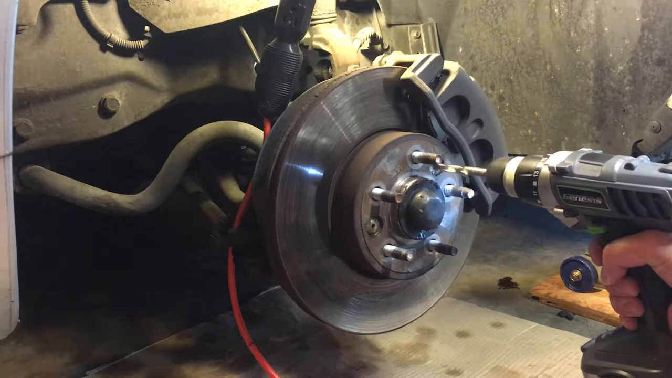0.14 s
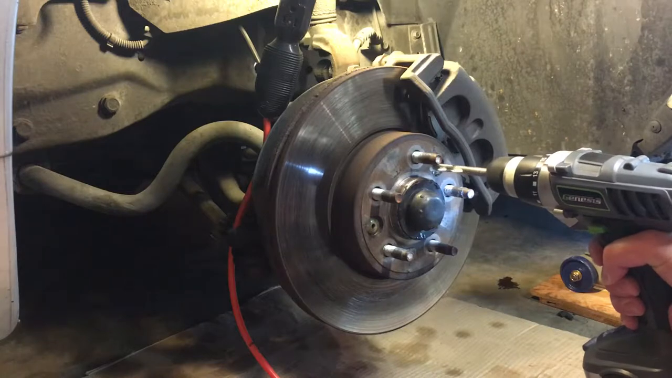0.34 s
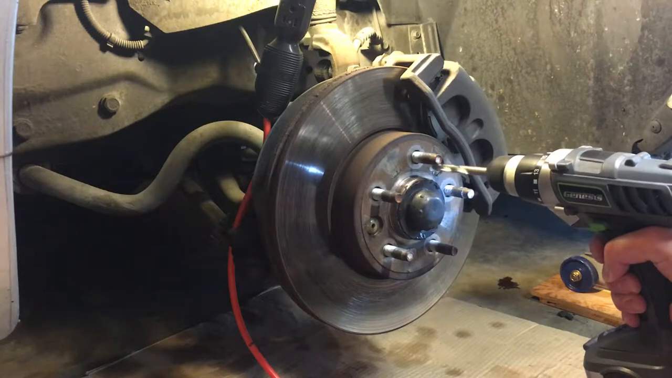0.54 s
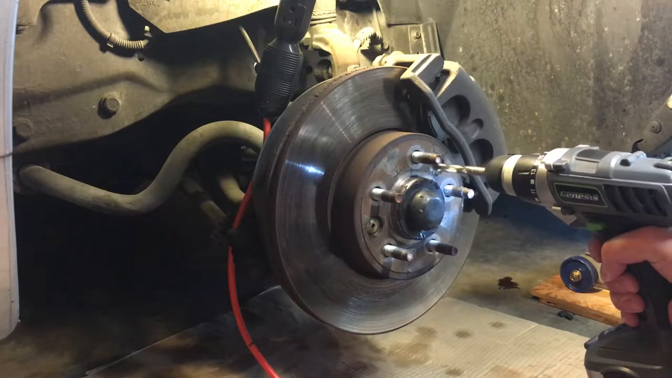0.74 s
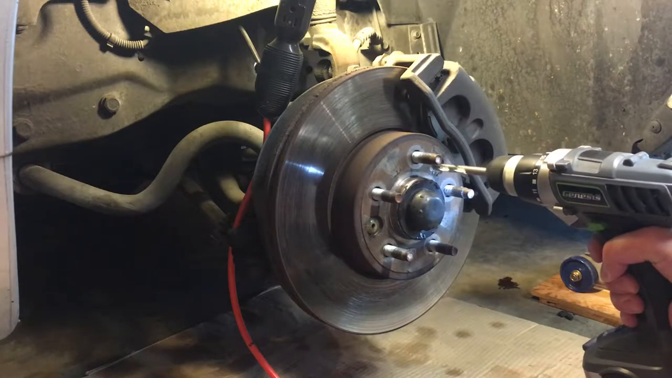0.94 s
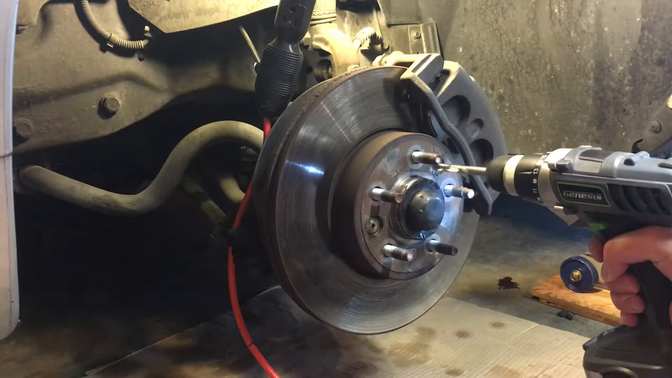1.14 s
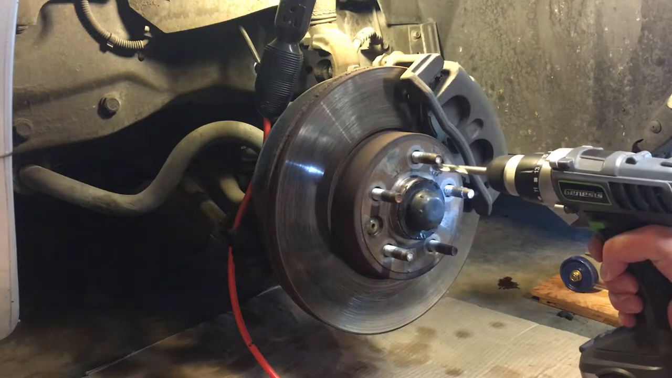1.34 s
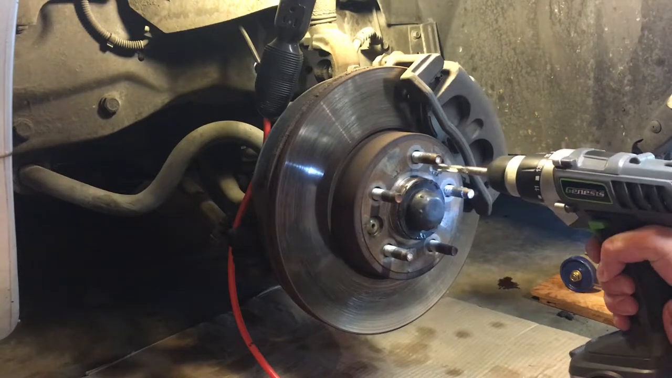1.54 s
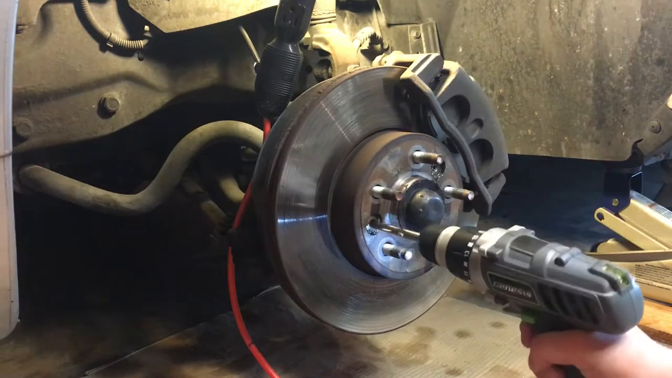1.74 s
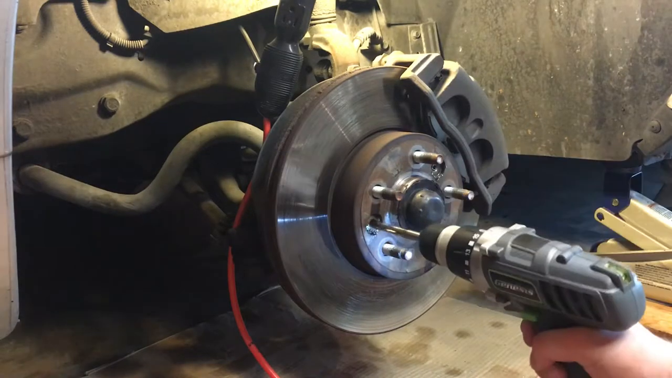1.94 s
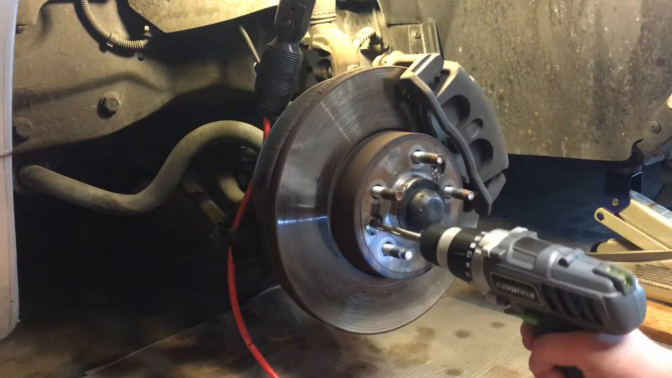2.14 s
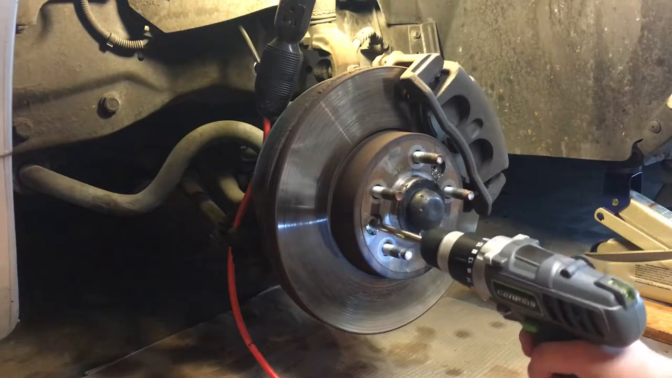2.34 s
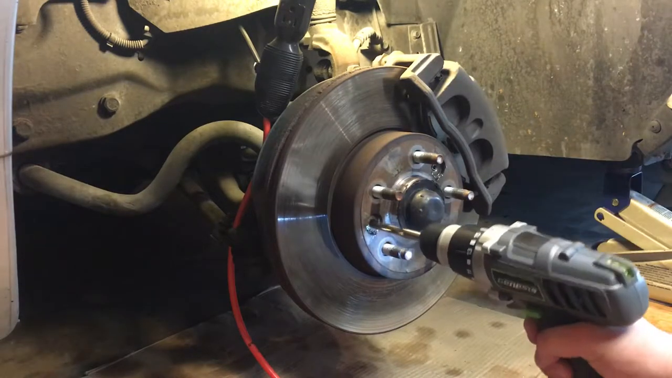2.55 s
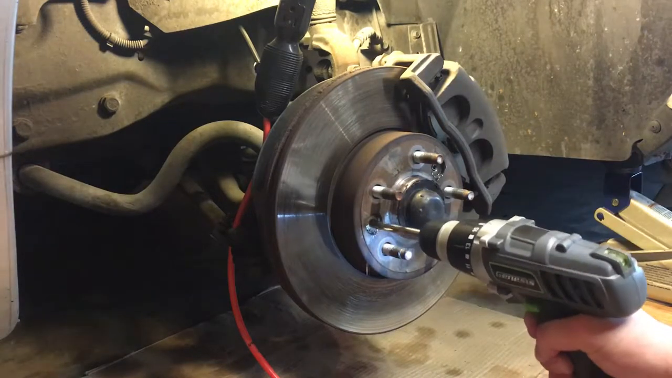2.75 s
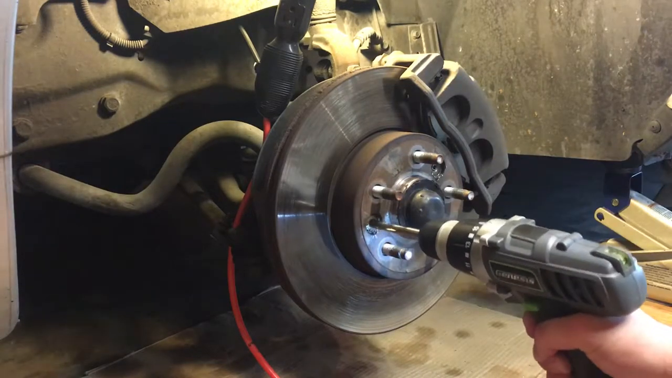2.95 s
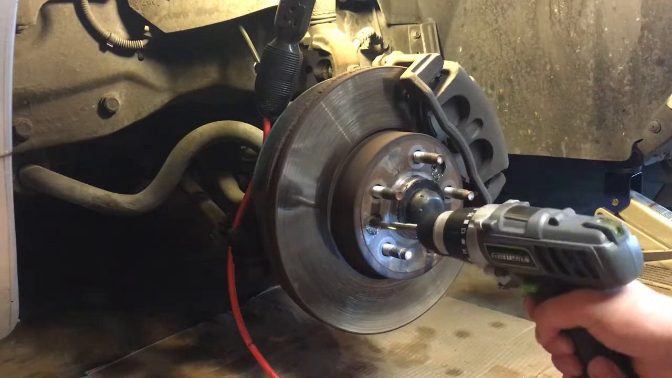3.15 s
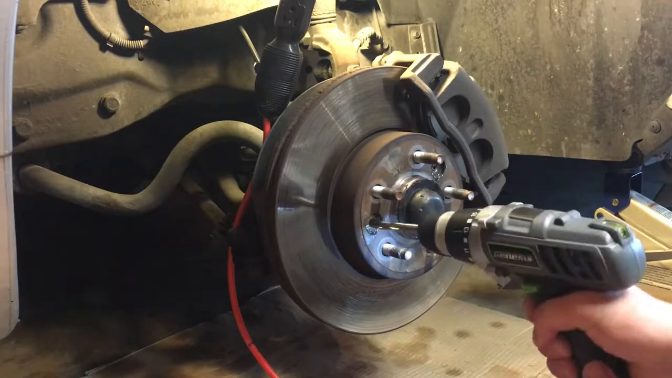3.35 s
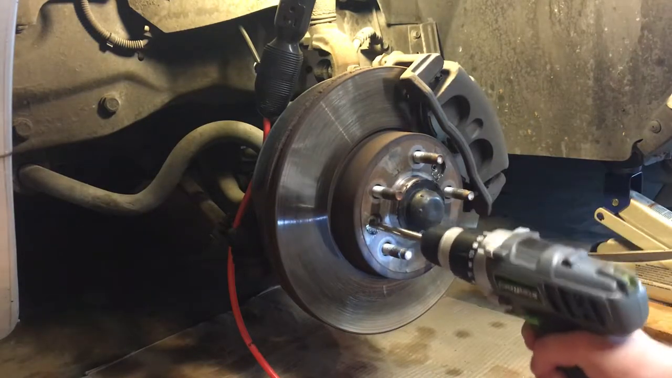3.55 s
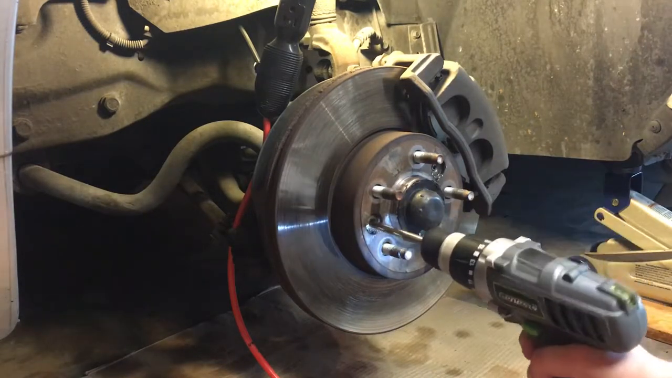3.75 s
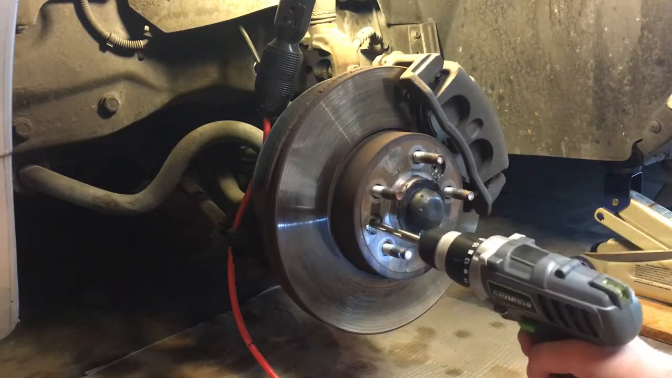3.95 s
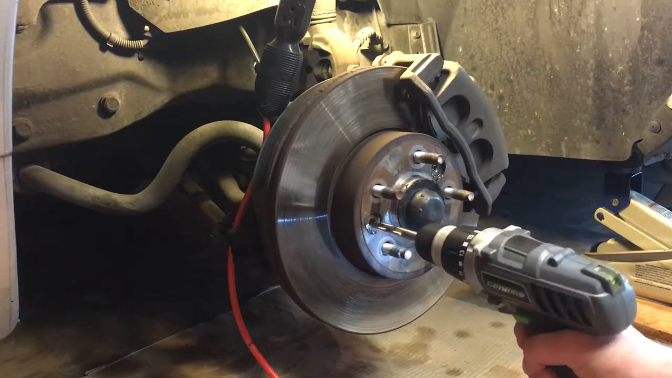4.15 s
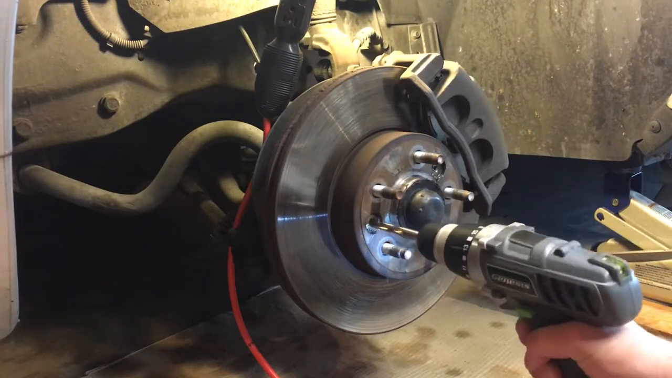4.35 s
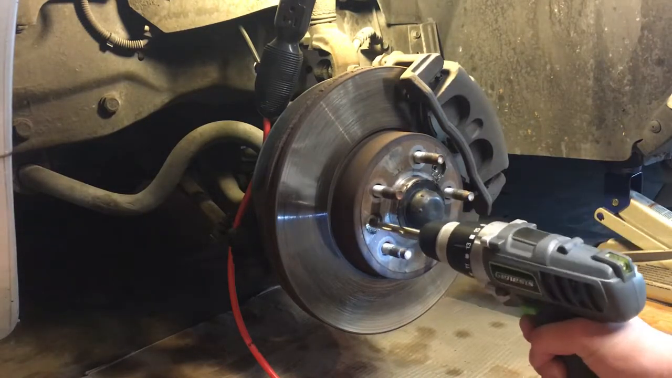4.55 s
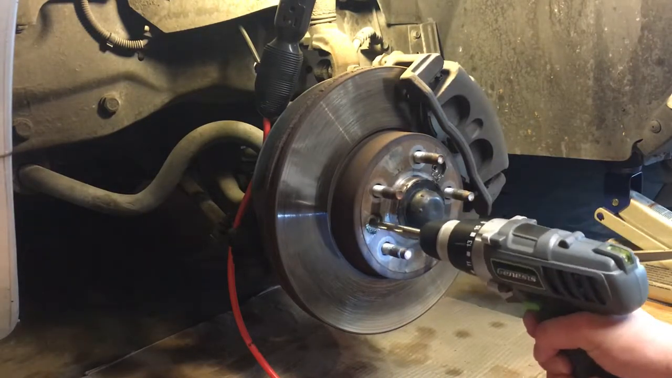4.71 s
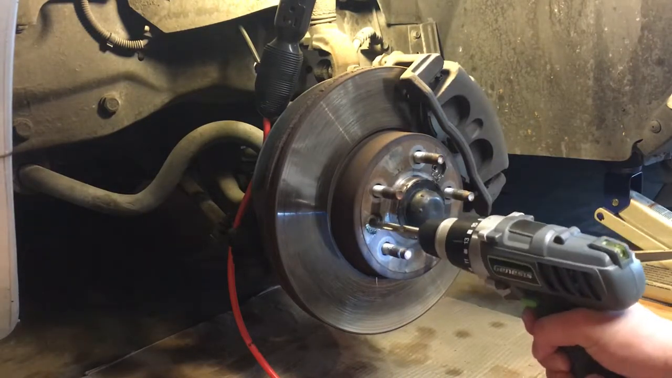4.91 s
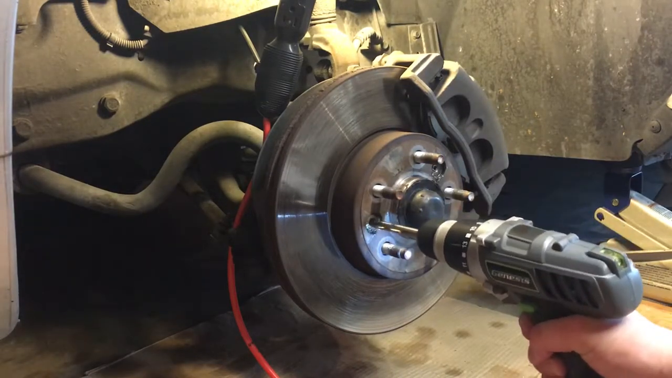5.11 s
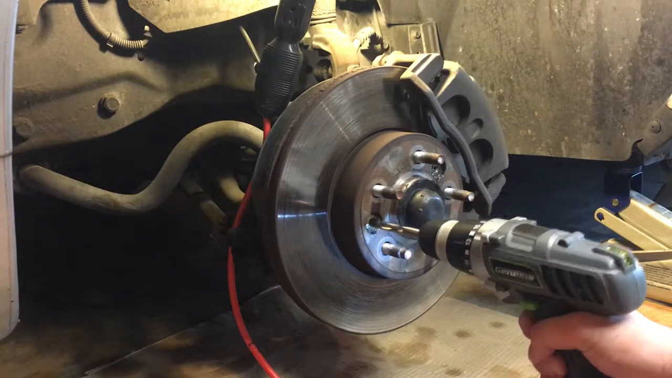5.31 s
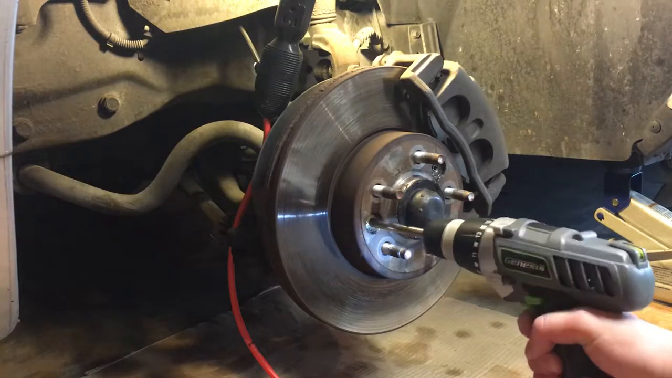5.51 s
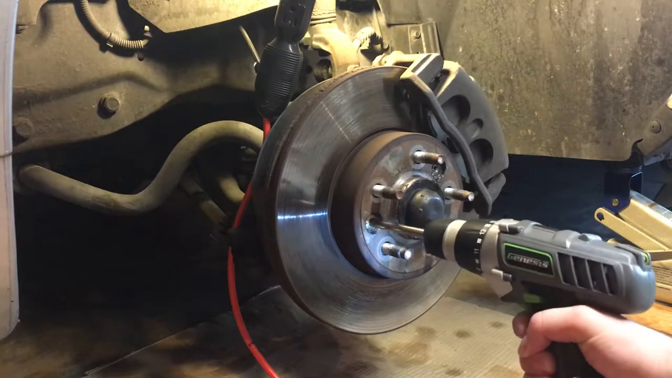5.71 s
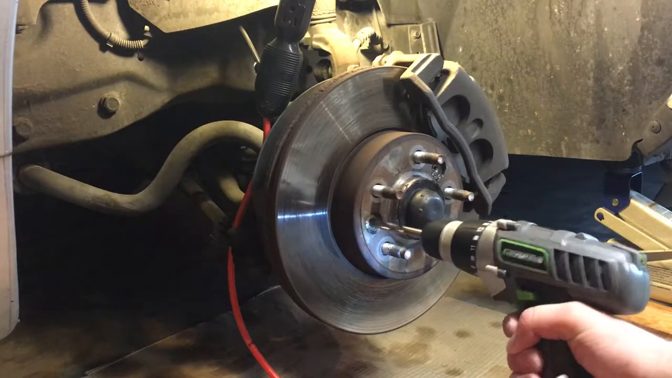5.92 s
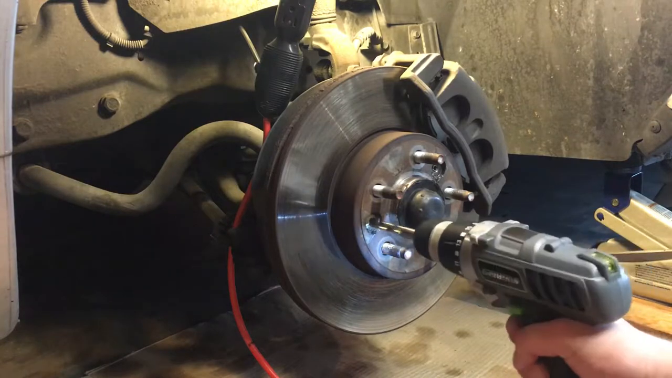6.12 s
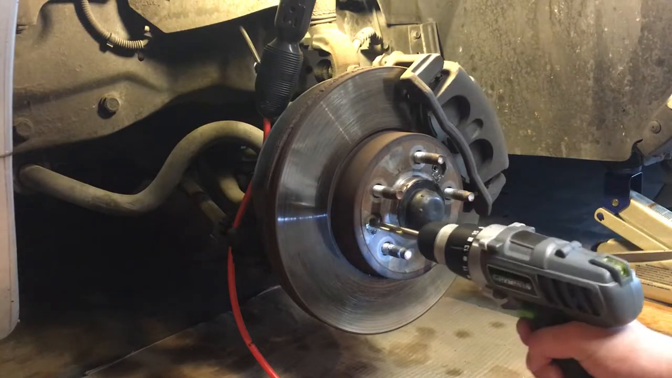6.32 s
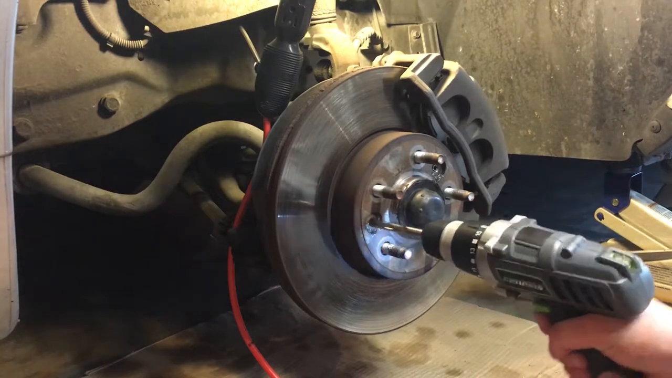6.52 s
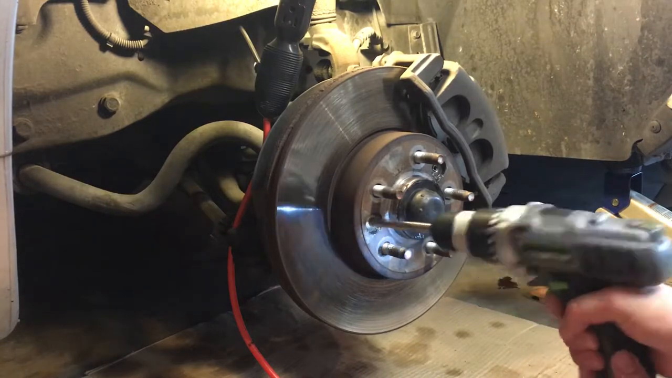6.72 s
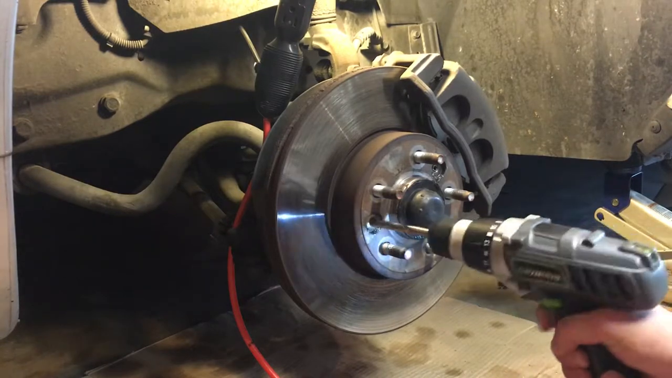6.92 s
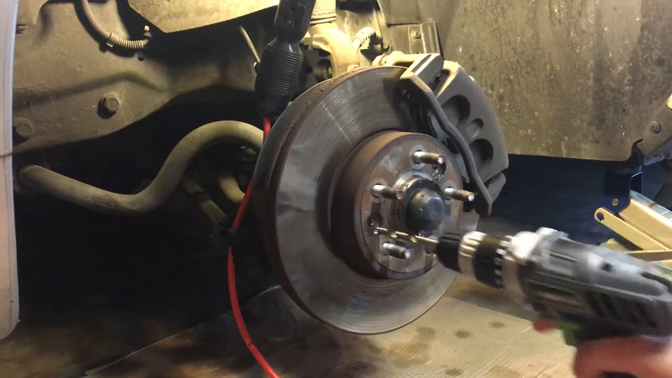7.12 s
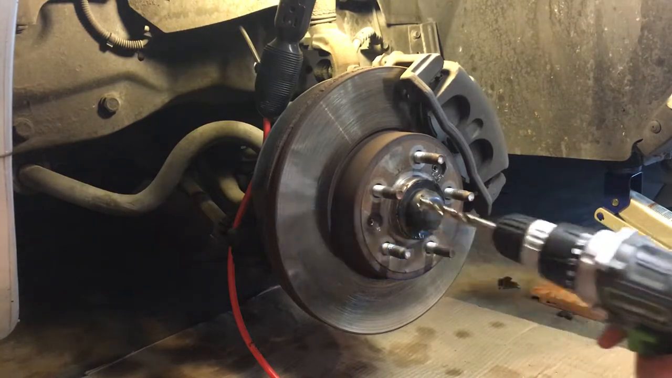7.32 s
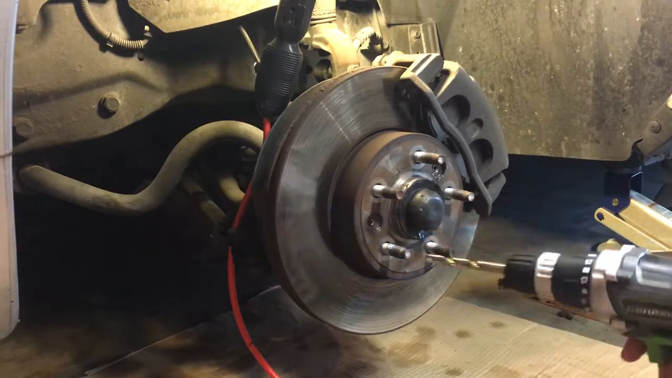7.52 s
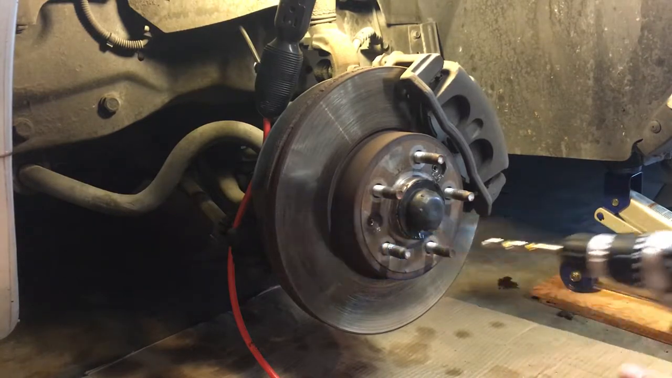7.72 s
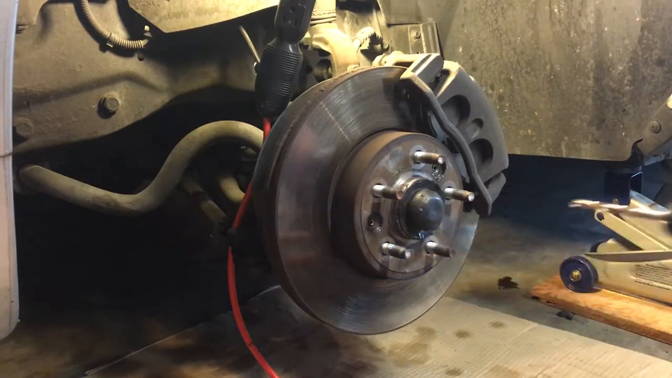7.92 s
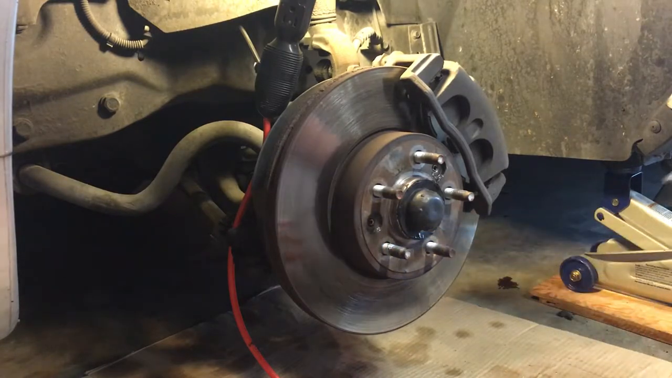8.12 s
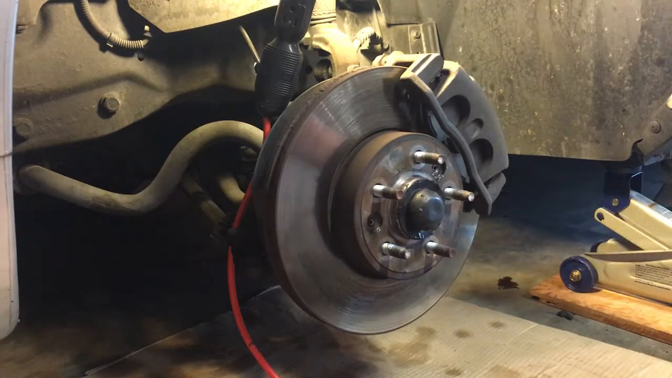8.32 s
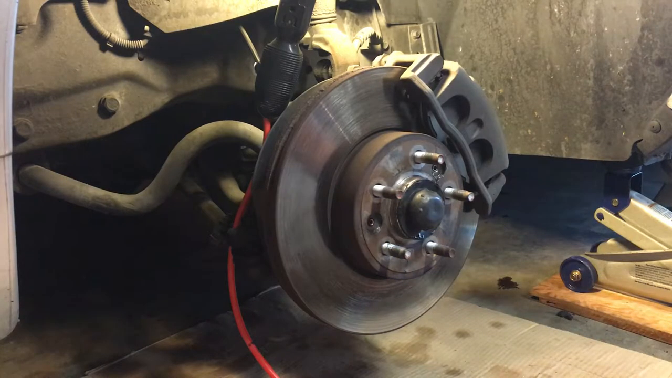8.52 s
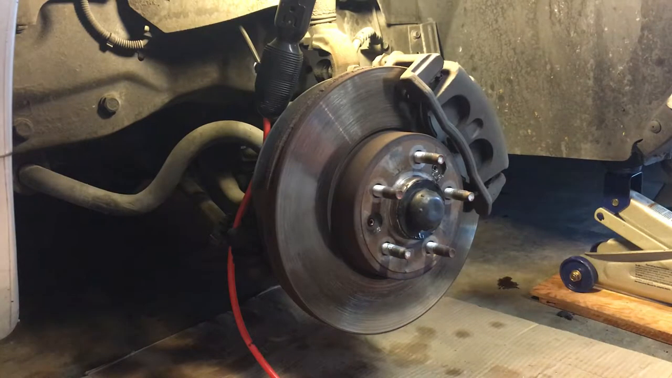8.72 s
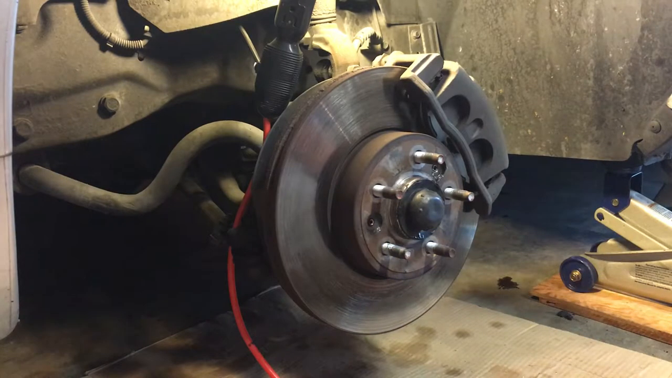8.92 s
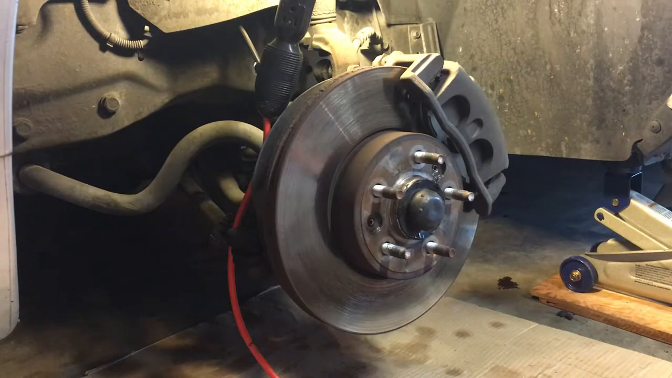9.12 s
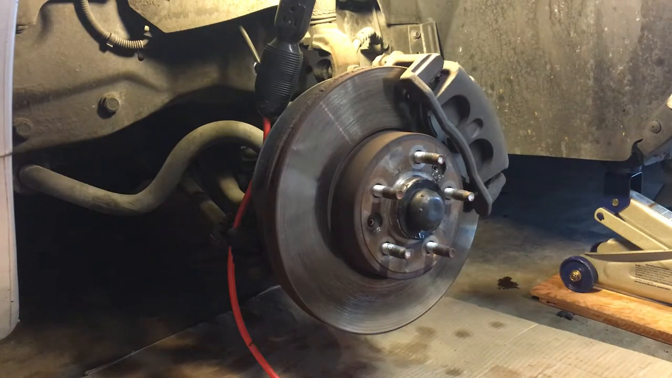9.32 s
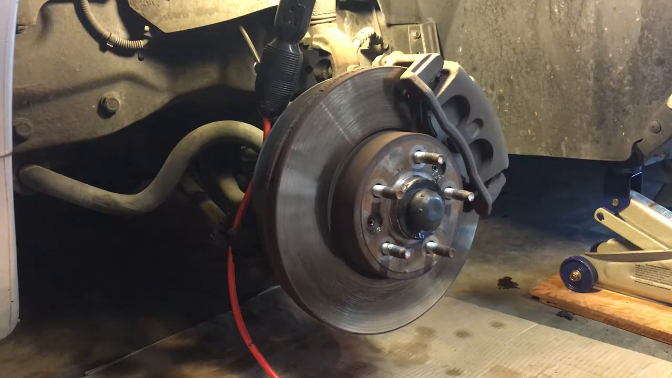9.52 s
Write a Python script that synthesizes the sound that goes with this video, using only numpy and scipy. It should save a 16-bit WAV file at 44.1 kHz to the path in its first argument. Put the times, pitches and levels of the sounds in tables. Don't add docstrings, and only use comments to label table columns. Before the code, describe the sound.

Steady rattling drill whine bores metal in a small garage, stops abruptly, followed by a sharp knock, light ticks, soft scuffs and a wooden double thud.

```python
import sys
import numpy as np
from scipy import signal
from scipy.fft import rfft, irfft, next_fast_len
from scipy.io import wavfile

SR = 44100
rng = np.random.default_rng(int(sys.argv[2]) if len(sys.argv) > 2 else 0)


def amplitude_ratio(level_db):
    exponent = np.asarray(level_db, float) / 20
    return 10 ** exponent


def master(y):
    cut = np.clip(np.atleast_2d(y).T, -1, 1)
    pcm = np.round(cut * 32767)
    wavfile.write(sys.argv[1], SR, pcm.astype(np.int16))


N = 421579

# (frequency [Hz], level [dB])
HUM_SPECTRUM = [(12, -46.5), (20, -24.5), (40, -10), (60, 6), (81, -9.5), (113, 1), (125, -13.5),
                (150, -12.5), (264, -22), (357, -38), (400, -46.5), (520, -70.5), (880, -120)]
# (time [s], level [dB])
HUM_LEVEL = [(0.0, -51), (1.28, -58.5), (1.97, -49), (2.88, -49), (2.98, -54), (6.3, -54.5), (6.73, -51),
             (9.56, -54)]
# (frequency [Hz], level [dB])
AIR_SPECTRUM = [(180, -31.5), (300, 0.5), (454, -10.5), (654, -9.5), (1340, -9), (1680, -17), (4790, -26),
                (11300, -27), (15800, -36.5)]
AIR_DB = -69

# (start [s], hold [s], peak [dB], bright over dull [dB])
SHUFFLE = [(7.097, 0.044, -56, -10), (7.4, .13, -69, -4), (7.58, .02, -52, -22), (7.95, 0.068, -74, -2),
           (8.153, 0.034, -60.5, -10), (8.66, .06, -73, -6), (8.797, 0.026, -54, -4),
           (8.9, 0.064, -63, -1.5), (9.24, .1, -67, -12), (9.37, 0.14, -57.5, -27)]
# (frequency [Hz], level [dB])
SCUFF_SPECTRUM = [(120, -51), (200, -14), (346, -2.5), (385, -5), (799, -10), (1000, -9), (1200, -8),
                  (1460, -13), (1570, -19), (2600, -34.5), (3380, -66), (5720, -120)]
SHUFFLE_RISE_DB_PER_S, SHUFFLE_FALL_DB_PER_S = 250, 180
DULL_REST_DB, BRIGHT_REST_DB = -77, -79

GARAGE_T60_S, GARAGE_DB = 0.32, -16
WALL_ECHO_S, WALL_ECHO_DB = 0.018, -10

# (time [s], peak [dB], ring [Hz], edge [dB], crack [dB])
SET_DOWN = [(8.646, -26, 1000, -10, -20), (8.649, -26, 1150, -4, -12), (8.768, -21, 1100, -8, -9),
            (8.786, -39, 1400, -6, -20), (8.74, -49, 950, -15, -20), (8.899, -52, 600, -15, -20),
            (8.958, -51, 560, -18, -22), (8.992, -49.5, 1100, -17, -6)]
# (frequency [Hz], level [dB], t60 [s])
BOARD_MODES = [(370, -4, 0.12), (543, 10.5, 0.029), (1042, -4.5, 0.081), (1180, -6, 0.05), (468, -10, .07),
               (651, -19, .08), (1319, -11.5, .07), (2300, -9, .05), (1420, -3, 0.054), (1840, -2, .045),
               (2050, -5, .04), (3670, -3, .03), (4300, -5, .03), (2660, 5, 0.022)]
# (time [s], peak [dB], ring [Hz], edge [dB], crack [dB])
KNOCKS = [(7.308, -38.5, 1100, -11, -24), (7.378, -39, 1340, -15, -24), (7.393, -12.5, 925, -9, -19.5),
          (7.484, -38, 918, -7, -15), (7.556, -36, 880, -14, -24), (7.565, -35.5, 960, -24, -28),
          (7.573, -33, 1240, -24, -26), (7.619, -34, 850, -24, -26), (7.649, -41, 1090, -18, -32),
          (7.686, -41, 1100, -15, -23), (7.592, -43, 1300, -22, -26), (8.148, -39, 1300, -2, -12),
          (8.151, -39, 3500, -3, -14), (8.158, -41, 1500, -6, -18)]
# (frequency [Hz], level [dB], t60 [s])
KNOCK_MODES = [(358, 0.5, 0.07), (450, -8, 0.1), (2150, -8, .04), (3700, -4, .025), (917, -3, 0.1),
               (1000, -5.5, .11), (1200, -10, 0.049), (1465, -16, 0.058)]
# (time [s], peak [dB], ring [Hz], edge [dB], crack [dB])
BRAKE = [
    (7.043, -17.5, 1700, -8, -9.5),
    (7.051, -19, 1480, -5, -6),
]
# (frequency [Hz], level [dB], t60 [s])
BRAKE_MODES = [(933, -6, 0.14), (1639, -10, 0.16), (1700, -9, 0.16), (2250, -11, 0.045), (2900, -16, 0.11)]
# (time [s], peak [dB], ring [Hz], edge [dB], crack [dB])
TICKS = [(0.4735, -17, 2740, -1, -13), (1.5245, -21.5, 6400, -6, -9.5), (7.1157, -35, 2900, -14, -22),
         (7.1412, -37, 2800, -14, -23), (7.1624, -46, 2862, -14, -17), (7.1754, -49, 1980, -13, -9),
         (7.1871, -48, 3560, -17, -3), (7.218, -43.5, 3300, -22, -3.5), (7.2838, -53, 1920, -4, -14),
         (7.3224, -54, 5940, -15, -11), (7.5144, -57, 2210, 5, -1), (7.546, -37, 2100, -4, -11),
         (7.575, -40, 1800, -20, -22), (7.5914, -46, 1850, -16, -18), (7.9349, -58, 1900, -19, -1),
         (7.9808, -59, 2300, -10, -3), (8.0046, -50, 2420, -13, -4), (8.0292, -49, 2370, -12, -15),
         (8.1234, -47, 2310, -3, -20), (8.1404, -50, 2380, -8, -10), (8.297, -55, 2850, -10, -11),
         (8.3205, -55.5, 5950, -12, -8.5), (8.4711, -46.5, 2260, -5, -11), (8.49, -47, 1100, -20, -22),
         (8.9344, -51, 2580, -6, -12), (8.968, -56, 2390, -7, -8)]
# (time [s], peak [dB], ring [Hz], edge [dB], crack [dB])
CHIPS = [(.0155, -20, 6000, -8, -4), (.1183, -22, 3980, -6, -8), (.2345, -20.5, 2200, -4, -9),
         (.246, -19, 4200, -4, -8), (.276, -19, 4300, -8, -8.5), (1.1562, -21, 2110, -5, -10),
         (1.2765, -23, 4000, -4, -11), (1.4733, -21, 4000, -10, -6.5), (3.1592, -18, 2100, -5, -14)]

SWARF_PER_S, SWARF_DB, SWARF_T60_S, SWARF_TILT_DB = 900, -42, 0.031, -2.5
# (start [s], end [s], centre [Hz], width [Hz], level [dB])
SQUEALS = [(0.0, 0.51, 6480.0, 180.0, -44.5), (0.0, 0.38, 4330.0, 200.0, -43.5),
           (0.0, 0.49, 9500.0, 180.0, -45), (0.0, 0.29, 8400.0, 230.0, -52), (0.0, 0.59, 3570, 170.0, -48),
           (0.51, 0.92, 6400.0, 180.0, -44), (0.81, 1.71, 3550, 170.0, -47),
           (1.29, 1.68, 6480.0, 200.0, -44), (1.43, 1.8, 3790.0, 180.0, -44),
           (1.57, 2.21, 4370.0, 170.0, -44), (1.78, 2.33, 8830.0, 230.0, -42.5),
           (2.34, 3.66, 4330.0, 210.0, -51), (2.38, 3.24, 4280, 170.0, -49),
           (2.38, 3.64, 4310.0, 200.0, -47.5), (2.44, 3.11, 7490.0, 180.0, -47),
           (2.48, 4.32, 4160.0, 230.0, -49), (2.94, 3.3, 6540, 170.0, -42.5),
           (3.23, 3.56, 11170, 180.0, -53.0), (3.33, 3.57, 6805, 170.0, -46),
           (3.51, 3.85, 10000, 240.0, -47), (3.63, 3.97, 7280.0, 200.0, -46),
           (4.02, 4.33, 7170.0, 170.0, -46), (4.36, 4.86, 4330.0, 150.0, -44),
           (4.77, 5.17, 3848, 170.0, -41.5), (4.91, 5.34, 4700, 180.0, -46), (5.24, 5.5, 3777, 210.0, -40),
           (5.26, 6.18, 6700, 180.0, -52), (5.26, 6.13, 6800, 230.0, -48), (5.43, 6.04, 4350.0, 170.0, -46),
           (5.44, 6.03, 4350.0, 170.0, -42), (5.86, 6.68, 4133, 140.0, -46),
           (6.06, 6.36, 9930, 290.0, -49.0), (6.15, 6.53, 7593, 170.0, -49.0),
           (6.25, 6.6, 4330.0, 170.0, -43.0)]
# (start [s], end [s], centre [Hz], width [Hz], level [dB])
SCRAPES = [(0.602, 1.0, 2670, 80, -44.5), (1.199, 1.5, 1770, 90, -42), (1.35, 1.68, 910, 73, -37),
           (5.332, 5.52, 2030, 80, -39), (6.683, 6.75, 2410, 900, -33), (6.801, 7.057, 12000, 2500, -41),
           (0, 1.85, 3480, 260, -45.5), (.8, 1.68, 4050, 220, -47), (0.3, 1.68, 11300, 600, -47.5),
           (3.65, 4.25, 3150, 320, -42), (4.2, 4.83, 3590, 230, -50), (1.9, 2.6, 7500, 300, -47),
           (6.25, 6.8, 6100, 250, -48), (3.7, 5.4, 2310, 86, -42.5), (2.9, 3.5, 3500, 200, -48),
           (.4, .6, 1100, 65, -39), (1.2, 1.66, 1090, 70, -46), (6.35, 6.5, 2310, 80, -42),
           (4.6, 4.8, 9200, 500, -48), (1.5, 4.2, 9700, 300, -52)]

# (frequency [Hz], level [dB])
UPPER_COLOUR = [(53, -53), (90, -14), (119, -17.5), (352, -8), (446, 0), (733, -15.5), (1080, -8.5),
                (1340, -9.5), (2120, -14), (2930, -15), (3560, -7), (5480, -11.5), (8630, -8.5),
                (14200, -16.5), (15800, -16)]
# (frequency [Hz], level [dB])
LOWER_COLOUR = [(53, -47), (90, -14), (254, -16), (359, -10), (508, -12), (702, -10.5), (782, -5),
                (1080, -6), (1310, -7.5), (2070, -6.5), (2860, -13.5), (4230, -10), (9610, -14),
                (14200, -21), (15800, -22)]
# (centre [Hz], width [Hz], gain [dB])
UPPER_RINGS = [(348, 23, 10), (453, 100, -16), (900, 73, 6), (1030, 29, -7), (1086, 64, 5.5),
               (1760, 120, 4.5), (2100, 110, 6.5), (4370, 83, 7), (6320, 390, 4), (8000, 310, -5),
               (10320, 500, -6)]
# (centre [Hz], width [Hz], gain [dB])
LOWER_RINGS = [(107, 18, 2.5), (214.5, 18, 7), (293, 7.4, 11), (496, 77, -7), (781.5, 75, -22.5),
               (900, 78, 2), (2300, 68, 4), (2900, 200, 0.5), (4330, 130, 0.8), (5070, 1000, -5.5),
               (7950, 300, -3), (10480, 730, -5)]
# (low [Hz], high [Hz], level over mean feed [dB], share of feed swing [1],
# change as the hole deepens [dB/s], swell per chuck turn [dB])
RATTLE_RANGES = [(80, 737, -12.5, 0.43, -0.23, 0.4), (823, 2580, -1.63, 1.07, -0.075, 0.64),
                 (2650, 22000, -1.4, 0.13, -0.0336, 0.8)]

# (multiple [1], upper hole [dB], lower hole [dB], line width [Hz], steady over shaken [1])
ROTOR_ORDERS = [(1, -52, -50.5, 33, 0.55), (2, -68, -53, 29, 0.85), (3, -45, -40.5, 40, 1.66),
                (4, -46.5, -44, 54, 1.45), (5, -45, -43, 58, 1.08), (6, -49, -41.5, 68, 0.66),
                (7, -47, -49.5, 42, .6), (9, -52, -59.5, 31, .6), (10, -47, -57.5, 79, .6)]
# (centre [Hz], width [Hz], gain [dB])
SHELL = [(724, 70, 5.5), (994, 73, -5.5), (1090, 74, 4), (1204, 98, -3.5), (1480, 81, 4), (1810, 100, 3),
         (2010, 70, 3.5), (2090, 110, 4.5), (2330, 100, 0), (4350, 140, 0)]
# (start [s], end [s], multiple [1], gain [dB])
SINGS = [(1.68, 2.05, 3, -4), (2.05, 2.75, 3, 2), (3.3, 3.596, 3, 1.5), (3.85, 4.3, 3, -2.5),
         (4.35, 4.92, 3, 2), (4.95, 5.401, 3, -1.5), (5.42, 5.9, 3, 0.5), (6.25, 6.76, 3, 2),
         (0, .15, 3, 4), (1.05, 1.35, 3, -1), (0, 1.0, 4, 4), (1.0, 1.66, 4, -2), (1.68, 2.05, 4, -8),
         (2.08, 2.3, 4, 2), (2.55, 3.15, 4, 3), (3.75, 4.5, 4, -1.5), (4.6, 5.0, 4, 0.5),
         (5.0, 5.35, 4, -5), (5.4, 6.05, 4, 1.2), (6.3, 6.75, 4, 2), (.25, .85, 5, 3), (1.68, 2.05, 5, -5),
         (2.05, 2.25, 5, 2), (3.55, 4.2, 5, 1), (4.3, 4.9, 5, -3), (5.5, 6.1, 5, -0.5), (6.5, 6.75, 5, 2),
         (6.8, 7.0, 5, 2), (1.68, 2.3, 6, -6), (2.3, 3.05, 6, -1), (3.1, 3.75, 6, 3.5), (4.05, 4.3, 6, 4),
         (5.5, 6.05, 6, -5), (6.05, 6.45, 6, 5), (6.5, 6.762, 6, -4), (6.85, 7.041, 6, 3),
         (7.04, 7.07, 9, 21)]
SING_EDGE_S = 0.03
ORDERS_TRIM_DB, ORDERS_FOLLOW, ORDERS_WANDER_DB = -3, 0.5, 0.3

# (time [s], speed [Hz])
ROTOR_SPEED = [(0, 391.2), (1.66, 388.4), (1.72, 363.3), (2.25, 367.6), (2.6, 357), (2.97, 356.8),
               (3.45, 356.9), (4.08, 354), (4.5, 360.3), (4.86, 370), (5.11, 397), (5.3, 389), (5.45, 358),
               (6.0, 371.6), (6.64, 374.5), (6.74, 362.3), (6.85, 394.3), (7.04, 400.6)]
# (time [s], sag [Hz], recovery [s], gain [dB])
BITES = [(3.2, 16, .12, 1), (3.71, 27, .1, 1.5), (4.121, 25, .16, 0), (6.1, 24, .3, -0.5),
         (6.22, 14, .08, -1.5), (4.25, 12, .06, -0.5), (3.97, 10, 0.0502, .6), (5.6, 10.02, .05, 1)]
# (time [s], level [dB])
FEED = [(0, -28.5), (.3, -29.5), (.9, -29), (1.3, -28.5), (1.64, -26.5), (1.69, -31.5), (2.03, -32),
        (2.08, -29.5), (2.6, -30.5), (3.3, -30.5), (4, -30), (4.6, -30), (5.3, -29), (5.7, -31), (6.1, -30),
        (6.7, -30), (6.76, -32), (7.0, -31.5)]
MOVE_S, GEAR_RATIO = 1.68, 45.18
CHUCK_UPPER_TURNS, CHUCK_LOWER_TURNS = -0.13, 0.41
CHUCK_SAG = 0.01296
RELEASE_S, RELEASE_DB_PER_S = 7.0, -120

SPLITS_PER_S, SPLIT_DB = 0.9, -2.5


def rms_one(x):
    return x / np.sqrt(np.mean(x ** 2) + 1e-20)


def in_time(curve):
    s, value = np.transpose(curve)
    return np.interp(np.arange(N) / SR, s, value)


def drift(rate_hz):
    r = np.exp(-40 * np.pi * rate_hz / SR)
    slow = signal.lfilter([1], [1, -2 * r, r * r], rng.standard_normal(N // 20 + 3002))[3000:]
    return np.interp(np.arange(N) / 20, np.arange(len(slow)), rms_one(slow))


def band(x, low_hz, high_hz, order=2):
    edges_hz = [low_hz, min(high_hz, 0.45 * SR)]
    return signal.sosfilt(signal.butter(order, edges_hz, "band", fs=SR, output="sos"), x)


def bells_db(hz, rings):
    return sum(db / (1 + (2 * (hz - centre_hz) / width_hz) ** 2) for centre_hz, width_hz, db in rings)


def coloured(x, spectrum, rings=()):
    size = next_fast_len(N)
    hz = np.maximum(np.arange(size // 2 + 1) * SR / size, 1)
    spectrum_hz, spectrum_db = np.transpose(spectrum)
    level_db = np.interp(np.log(hz), np.log(spectrum_hz), spectrum_db) + bells_db(hz, rings)
    return irfft(rfft(x, size) * amplitude_ratio(level_db), size)[:N]


def hum():
    rumble = rms_one(coloured(rng.standard_normal(N), HUM_SPECTRUM))
    hiss = rms_one(coloured(rng.standard_normal(N), AIR_SPECTRUM))
    return amplitude_ratio(in_time(HUM_LEVEL) + 0.5) * rumble + amplitude_ratio(AIR_DB) * hiss


def shuffle():
    t = np.arange(N) / SR
    dull_gain, bright_gain = amplitude_ratio(DULL_REST_DB), amplitude_ratio(BRIGHT_REST_DB)
    for s, hold_s, peak_db, bright_db in SHUFFLE:
        rise_db = SHUFFLE_RISE_DB_PER_S * np.maximum(s - t, 0)
        fall_db = SHUFFLE_FALL_DB_PER_S * np.maximum(t - s - hold_s, 0)
        move = amplitude_ratio(peak_db - rise_db - fall_db)
        dull_gain = dull_gain + move
        bright_gain = bright_gain + move * amplitude_ratio(bright_db)
    dull = rms_one(coloured(rng.standard_normal(N), SCUFF_SPECTRUM)) * amplitude_ratio(1.2 * drift(30))
    bright = coloured(rng.standard_normal(N), [(1200, 4), (2200, 7), (6000, -1), (15500, -15)],
                      [(4900, 400, -8), (10400, 600, -17)])
    return dull_gain * dull + bright_gain * rms_one(bright) * amplitude_ratio(0.92 * drift(40.9))


def garage(x):
    t = np.arange(SR // 2) / SR
    tail = band(rng.standard_normal(len(t)), 180, 9100, order=1)
    tail = tail * amplitude_ratio(-60 * t / GARAGE_T60_S) * (t > 0.006)
    return amplitude_ratio(GARAGE_DB) * signal.fftconvolve(x, tail / np.linalg.norm(tail))[:N]


def wall_echo(x):
    lag = round(WALL_ECHO_S * SR)
    return x + amplitude_ratio(WALL_ECHO_DB) * band(np.pad(x, (lag, 0))[:N], 300, 2100, order=1)


def knocks(events, modes, ring_db, body_db, decay_s):
    out = np.zeros(N + SR)
    t = np.arange(round(4 * decay_s * SR)) / SR
    fade_db = -60 * t / decay_s
    for s, peak_db, ring_hz, edge_db, crack_db in events:
        noise = rng.standard_normal(len(t))
        blow = amplitude_ratio(ring_db) * np.sin(2 * np.pi * ring_hz * t) * amplitude_ratio(fade_db / 0.5)
        for hz, mode_db, t60_s in modes:
            chance = rng.standard_normal()
            nearness_db = -5 * abs(np.log2(hz / ring_hz))
            tone = np.sin(2 * np.pi * hz * (1 + 0.0118 * chance) * t)
            blow += amplitude_ratio(mode_db - 9 + nearness_db + 1.4 * chance) * tone * amplitude_ratio(fade_db * 0.052 / t60_s)
        body = rms_one(band(noise, 0.66 * ring_hz, 1.71 * ring_hz))
        edge = rms_one(band(noise, 1300, 4660))
        crack = rms_one(band(noise, 4200, 8000, order=1))
        blow += amplitude_ratio(body_db) * body * amplitude_ratio(fade_db / 2.67)
        blow += amplitude_ratio(edge_db - 7) * edge * (amplitude_ratio(fade_db / 0.5) + amplitude_ratio(-9.5) * amplitude_ratio(fade_db / 2.8))
        blow += amplitude_ratio(crack_db - 4.5) * crack * (amplitude_ratio(fade_db / 0.5) + amplitude_ratio(-7.5) * amplitude_ratio(fade_db / 2.4))
        at = round(s * SR)
        out[at:at + len(t)] += amplitude_ratio(peak_db) * blow * np.minimum(t / 0.00086, 1)
    return out[:N]


def swarf(runout):
    hit = rng.random(N) < SWARF_PER_S * amplitude_ratio(1.5 * runout) / SR
    sizes = amplitude_ratio(3.1 * np.minimum(rng.exponential(1, N), 4)) * hit
    dealt = rng.integers(0, 24, N)
    modes_hz = np.geomspace(2700, 14000, 24) * rng.uniform(0.97, 1.03, 24)
    r = amplitude_ratio(-60 / (SWARF_T60_S * SR))
    out = np.zeros(N)
    for k, hz in enumerate(modes_hz):
        w = 2 * np.pi * hz / SR
        hits = sizes * (dealt == k) + 1e-18
        ring = signal.lfilter([0, np.sin(w)], [1, -2 * r * np.cos(w), r * r], hits)
        out += amplitude_ratio(SWARF_TILT_DB * np.log2(hz / 2700)) * ring
    return amplitude_ratio(SWARF_DB) * rms_one(out)


def squeals():
    out = np.zeros(N)
    for start_s, end_s, hz, width_hz, level_db in [*SQUEALS, *SCRAPES]:
        first, count = round(start_s * SR), round((end_s - start_s) * SR)
        noise = rng.standard_normal(count + 2000)
        tone = rms_one(band(noise, hz - width_hz / 2, hz + width_hz / 2)[2000:])
        out[first:first + count] += amplitude_ratio(level_db) * tone * np.sqrt(np.hanning(count))
    return out


def rattle(turns, at_lower, mean_db, feed_db, runout):
    t = np.arange(N) / SR
    chatter_db = 1.1 * drift(400) + 0.3 * drift(35)
    bunching = 1 + 0.14 * np.cos(2 * np.pi * turns)
    contacts = rng.standard_normal(N) * amplitude_ratio(chatter_db) * bunching
    upper = coloured(contacts, UPPER_COLOUR, UPPER_RINGS)
    lower = coloured(contacts, LOWER_COLOUR, LOWER_RINGS)
    out = np.zeros(N)
    for low_hz, high_hz, trim_db, share, db_per_s, runout_db in RATTLE_RANGES:
        upper_part = rms_one(band(upper, low_hz, high_hz, order=3))
        lower_part = rms_one(band(lower, low_hz, high_hz, order=3))
        part = upper_part * (1 - at_lower) + lower_part * at_lower
        flutter_db = share * 0.73 * drift(18) + 0.33 * drift(13) + runout_db * runout
        out += amplitude_ratio(mean_db + trim_db + share * feed_db + db_per_s * t + flutter_db) * part
    return out


def rotor(speed_hz, turns, at_lower, feed_db):
    t, grid_hz = np.arange(N) / SR, np.arange(0, 6000, 5)
    lift_db = bells_db(grid_hz, SHELL)
    out = np.zeros(N)
    for order, upper_db, lower_db, width_hz, steady in ROTOR_ORDERS:
        phase = 2 * np.pi * order * turns
        shaken = (steady + drift(width_hz * 0.73)) * np.cos(phase) + drift(width_hz * 0.9) * np.sin(phase)
        sings_db = np.zeros(N)
        for start_s, end_s, sung, gain_db in SINGS:
            if sung == order:
                corners_s = [start_s - SING_EDGE_S, start_s, end_s, end_s + SING_EDGE_S]
                sings_db += gain_db * np.interp(t, corners_s, [0, 1, 1, 0])
        hole_db = upper_db + (lower_db - upper_db) * at_lower
        shell_db = np.interp(order * speed_hz, grid_hz, lift_db)
        load_db = ORDERS_TRIM_DB + shell_db + ORDERS_FOLLOW * feed_db
        wander_db = ORDERS_WANDER_DB * drift(0.98) + 0.17 * order * drift(10)
        out += amplitude_ratio(hole_db + load_db + sings_db + wander_db) * shaken
    return out


def drill():
    t = np.arange(N) / SR
    speed_hz, bite_db = in_time(ROTOR_SPEED), 0
    for s, sag_hz, recovery_s, gain_db in BITES:
        grip = np.exp(-np.maximum(t - s, 0) / recovery_s) * np.clip((t - s) / 0.04 + 1, 0, 1)
        speed_hz = speed_hz - sag_hz * grip
        bite_db = bite_db + gain_db * grip
    chuck_start = np.where(t < MOVE_S, CHUCK_UPPER_TURNS, CHUCK_LOWER_TURNS)
    chuck_turns = np.cumsum(speed_hz) / SR / GEAR_RATIO + chuck_start
    runout = np.cos(2 * np.pi * chuck_turns) * (1 + 0.33 * drift(3.25))

    braked = np.clip(1 - (t - 7.045) / 0.055, 0.1, 1)
    speed_hz = speed_hz * braked * (1 - CHUCK_SAG * runout)
    turns = np.cumsum(speed_hz * (1 + 0.0039 * drift(15.23) + 0.003 * drift(4))) / SR
    at_lower = np.clip((t - MOVE_S) / 0.01, 0, 1)
    mean_db = np.mean(FEED, axis=0)[1]
    feed_db = in_time(FEED) - mean_db

    wobble = amplitude_ratio(bite_db + 0.35 * runout)
    spinning = amplitude_ratio(-1500 * np.maximum(t - 7.062, 0) + RELEASE_DB_PER_S * np.clip(t - RELEASE_S, 0, 0.04))
    cutting = amplitude_ratio(-1200 * np.maximum(t - 7.058, 0) + RELEASE_DB_PER_S * np.maximum(t - RELEASE_S, 0))
    whine = spinning * rotor(speed_hz, turns, at_lower, feed_db)
    grind = cutting * (rattle(turns, at_lower, mean_db, feed_db, runout) + swarf(runout))
    return wobble * whine + grind + amplitude_ratio(2.5 * runout) * squeals()


def scene():
    hub = knocks(KNOCKS, KNOCK_MODES, ring_db=-11, body_db=-17.5, decay_s=0.045)
    board = knocks(SET_DOWN, BOARD_MODES, ring_db=-14, body_db=-13, decay_s=0.084)
    brake = knocks(BRAKE, BRAKE_MODES, ring_db=-7, body_db=-18, decay_s=0.057)
    ticks = knocks([*TICKS, *CHIPS], [], ring_db=-4.5, body_db=-28, decay_s=0.049)
    near = drill() + wall_echo(hub + board) + brake + ticks
    mono = near + garage(near) + shuffle() + hum()
    return np.array([mono, mono])


def top_cut(x):
    return signal.sosfilt(signal.butter(12, 15840, fs=SR, output="sos"), x)


def record(dry):
    cut = signal.sosfilt(signal.cheby2(16, 60, 16050, fs=SR, output="sos"), dry)
    spells = rng.random(N // 1024 + 2) < SPLITS_PER_S * 1024 / SR
    split = np.interp(np.arange(N) / 1024, np.arange(len(spells)), spells * 1.0)
    treble = band(np.roll(cut[0], 700), 4200, 15800, order=8)
    apart = treble * split * amplitude_ratio(SPLIT_DB)
    return top_cut(cut + apart * [[1], [-1]])


dry = scene()
out = record(dry)
master(out)
```